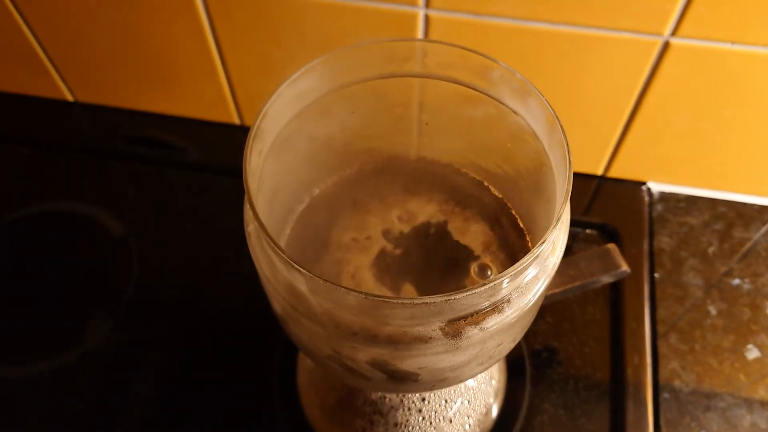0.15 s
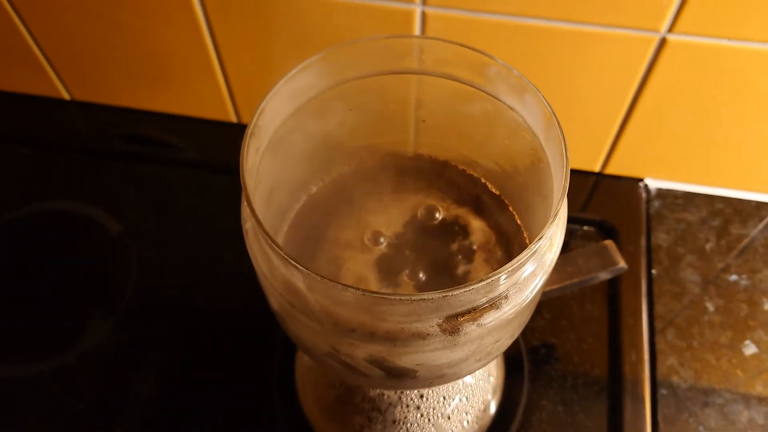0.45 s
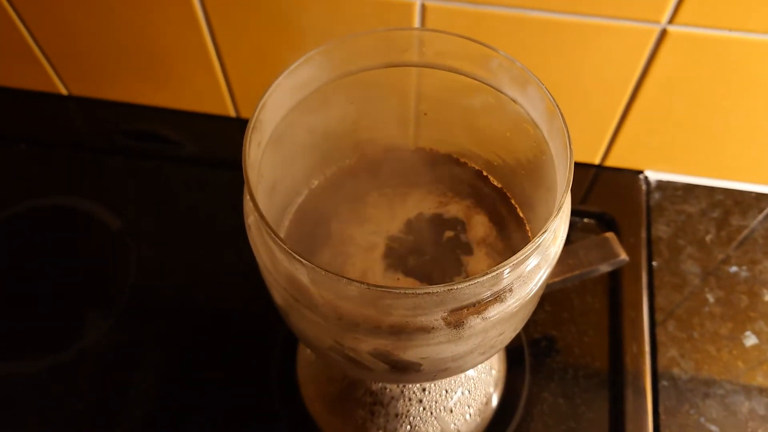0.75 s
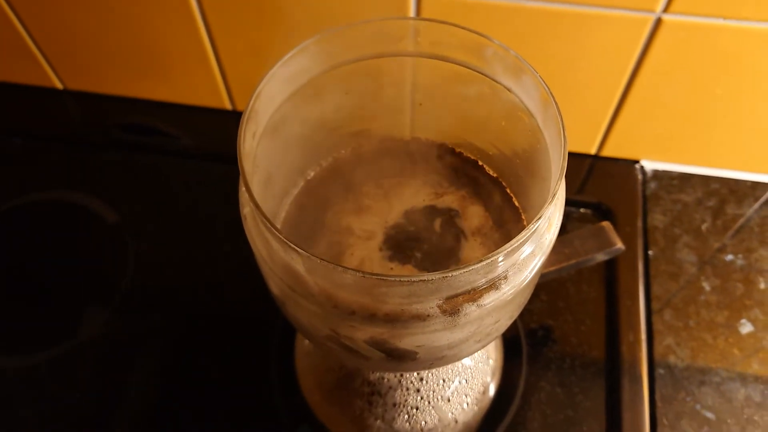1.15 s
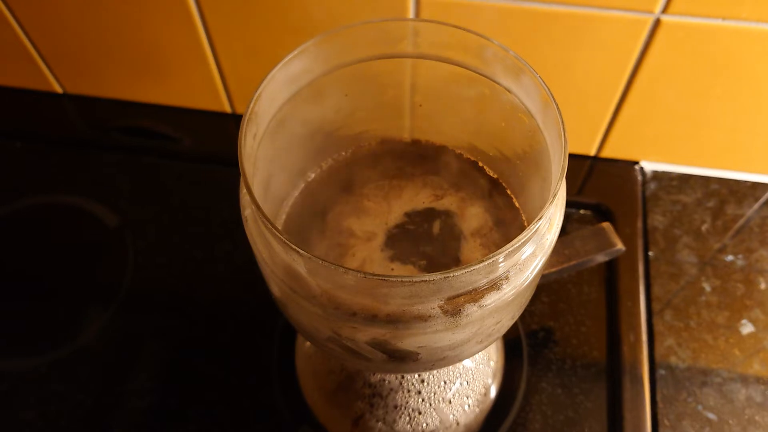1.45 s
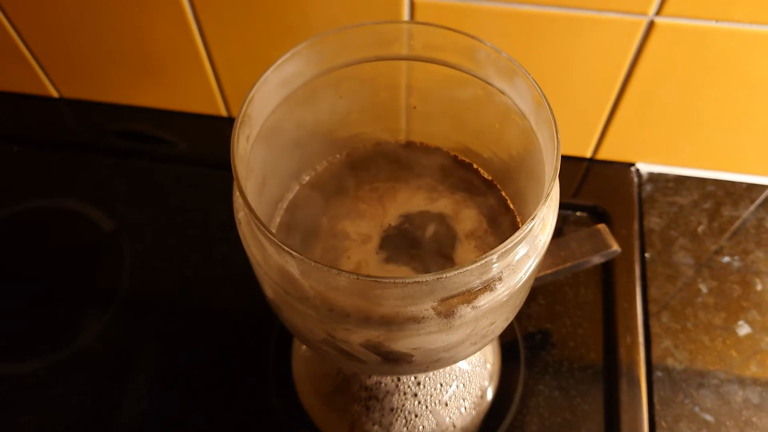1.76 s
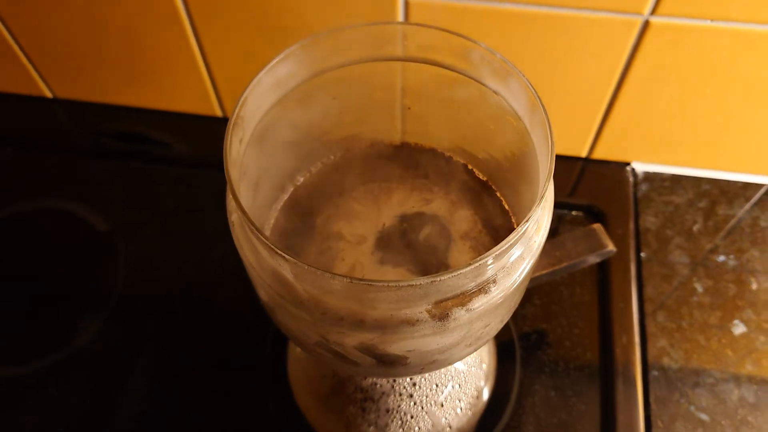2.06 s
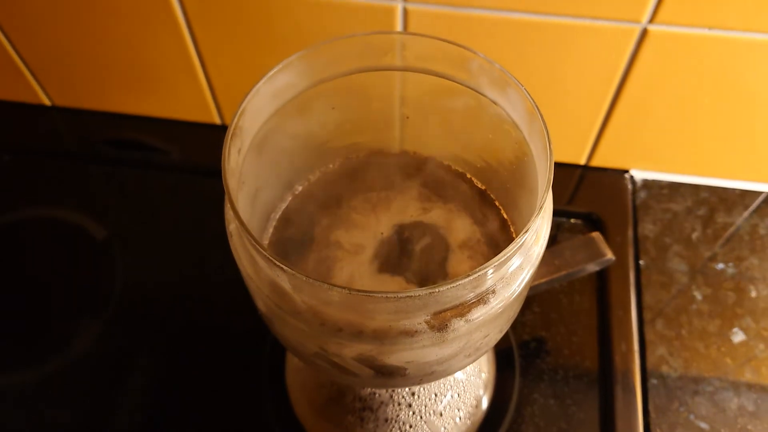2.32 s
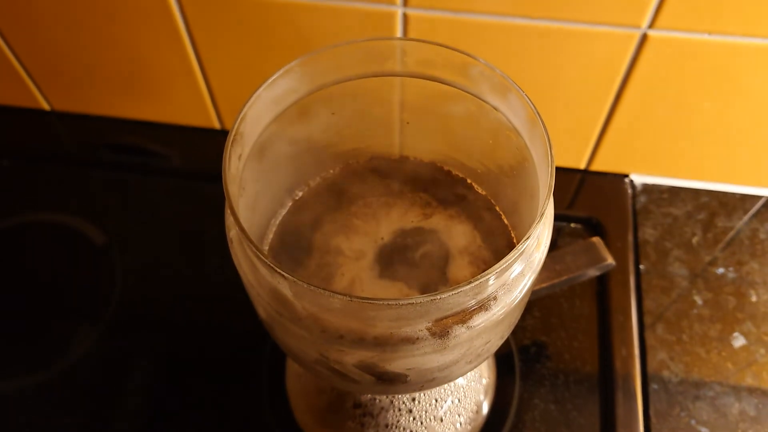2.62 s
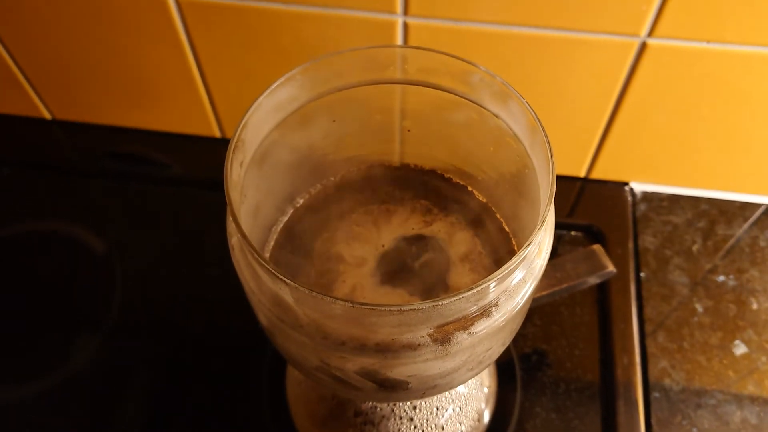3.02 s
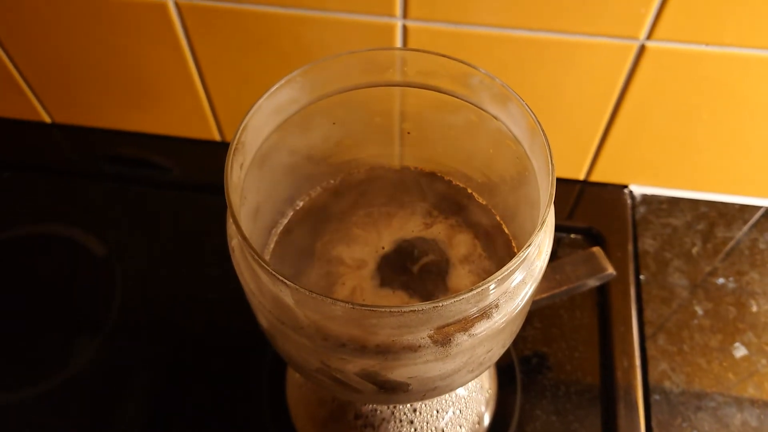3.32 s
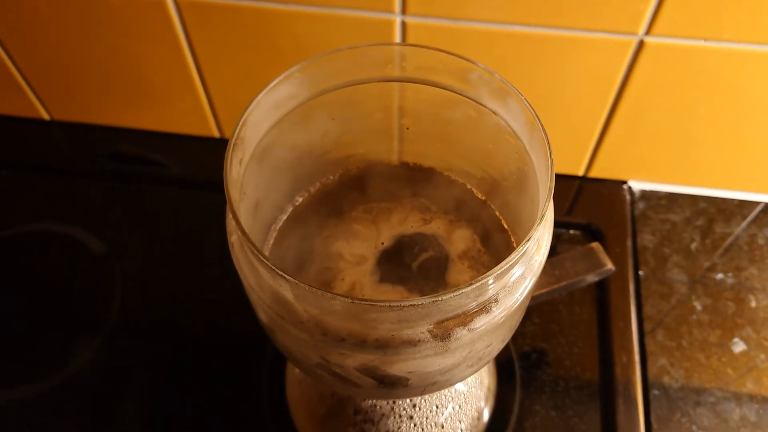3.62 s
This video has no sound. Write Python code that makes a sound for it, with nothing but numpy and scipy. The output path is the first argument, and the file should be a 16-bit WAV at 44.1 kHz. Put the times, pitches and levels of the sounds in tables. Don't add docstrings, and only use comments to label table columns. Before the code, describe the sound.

Coffee maker's last bubbles and sputtering steam die into ticking creaks and a quiet kitchen hum.

```python
import sys
import numpy as np
from scipy import signal
from scipy.io import wavfile
from scipy.ndimage import uniform_filter1d

SR = 44100
rng = np.random.default_rng(int(sys.argv[2]) if len(sys.argv) > 2 else 0)


def decibels_to_gain(level_db):
    exponent = np.asarray(level_db, float) / 20
    return 10 ** exponent


def wrap_up_sound(samples):
    columns = np.atleast_2d(samples).T
    tamed = np.clip(columns, -1, 1)
    steps = np.round(tamed * 32767).astype(np.int16)
    wavfile.write(sys.argv[1], SR, steps)


N = 166698
PORT_LAG_S = 0.00069


def at(table, x, log=False):
    a = np.array(table, float)
    if log:
        return np.interp(np.log(x), np.log(a[:, 0]), a[:, 1])
    return np.interp(x, a[:, 0], a[:, 1])


def band(x, hz, width):
    return signal.lfilter(*signal.iirpeak(min(hz, .45 * SR), hz / width, fs=SR), x)


def noise():
    return rng.standard_normal(N)


def unit(x):
    return x / np.sqrt(np.mean(x ** 2))


def walk(rate):
    k = int(SR / rate)
    steps = np.repeat(rng.standard_normal(N // k + 1), k)
    return unit(uniform_filter1d(uniform_filter1d(steps, k), k)[:N])


def pan(db):
    return decibels_to_gain(np.array([[db / 2], [-db / 2]]))


def spread(mid, side):
    return np.array([mid + side, mid - side])


def late(x, s):
    return np.roll(x, int(s * SR))


def ticks(rows, db):
    x = np.zeros(N)
    np.add.at(x, (np.array(rows)[:, 0] * SR).astype(int), decibels_to_gain(db))
    return x


def push(x, hz, damp):
    turns = np.arange(int(3 * SR / hz)) / SR * hz
    shape = np.sin(2 * np.pi * turns) * np.exp(-turns * damp)
    return signal.fftconvolve(x, shape / shape.max())[:N]


def flick(x, hz):
    u = np.pi * hz * (np.arange(int(2 * SR / hz)) / SR - 1 / hz)
    shape = (1 - 2 * u ** 2) * np.exp(-u ** 2)
    return late(signal.fftconvolve(x, shape)[:N], -1 / hz)


# pitch_hz [Hz], level_db [dB], width_hz [Hz]
APPLIANCE_TONES = [(4537, -88, 15), (14008, -94, 2.3), (4830, -90.5, 14), (417, -82.5, 20), (516, -86, 18)]
# time_s [s], level_db [dB]
RUMBLE = [(0, -66), (1.05, -67), (1.15, -74), (1.7, -68), (2.3, -69), (2.6, -80), (3.78, -82)]
# time_s [s], level_db [dB]
VESSEL_SONG = [
    (3.23, -92),
    (3.27, -60.5),
    (3.5, -60.5),
    (3.68, -52.5),
    (3.78, -68),
]
# middle_s [s], half_width_s [s], left_db [dB], right_db [dB]
TOUCH = (1.803, .016, -5, -18)


def hum(t):
    hum_hz, hum_db, vessel_hz = 49.333, -43, 106.6
    touch_s, length_s, left_db, right_db = TOUCH
    dip = 1 - decibels_to_gain(np.array([[left_db], [right_db]]))
    cover = 1 - dip * np.exp(-((t - touch_s) / length_s) ** 2)
    wander_db = 1 * np.array([walk(19), walk(5.9)]) + 0.55 * walk(18)
    mains = 2 ** .5 * np.sin(2 * np.pi * hum_hz * t + 1.15)
    out = cover * decibels_to_gain(hum_db + wander_db) * mains * pan(-1.8)
    mid, side = (unit(band(band(noise(), vessel_hz, 6.4), vessel_hz, 65)) for _ in range(2))
    out = out + decibels_to_gain(at(RUMBLE, t)) * spread(mid, side)
    song = 2 ** .5 * np.sin(2 * np.pi * vessel_hz * t + 0.19 * walk(7.8))
    out = out + decibels_to_gain(at(VESSEL_SONG, t) + walk(6.3)) * song
    sub_hz, sub_db = 28.3, -79
    out = out + decibels_to_gain(sub_db) * unit(band(band(noise(), sub_hz, 6.4), sub_hz, 12))
    for hz, db, width in APPLIANCE_TONES:
        tone = unit(band(band(noise(), hz, width), hz, 3 * width))
        out = out + decibels_to_gain(db) * tone * pan(13 if hz > 1000 else 0)
    return out


# pitch_hz [Hz], level_db [dB per Hz]
ROOM_LOW = [(60, -11), (80, -20.5), (170, -34.5), (270, -88), (390, -35), (800, -41), (1300, -45.5),
            (2400, -53.5)]
ROOM_HIGH = [(2400, -6.5), (4400, -3.5), (6500, -16), (10500, -16), (13500, -23.5), (16000, -10)]
# time_s [s], simmer_db [dB]
BOIL = [(0, 2.5), (.7, 2.5), (1.7, 2), (2.3, 1), (2.6, 0), (3.78, 0)]
# pitch_hz [Hz], width_hz [Hz], boost_db [dB]
LEFT_RESONANCES = [(1105, 210, 7), (3390, 1500, 2.5), (3900, 41, 8.5), (4600, 300, 11), (5530, 290, -3),
                   (7840, 680, 10.5)]
RIGHT_RESONANCES = [(1195, 230, 9.5), (1960, 460, 11.75), (4966, 57, 12), (5685, 92, 16), (6000, 230, 9.7),
                    (8870, 270, 11.6), (12800, 1800, 8.4)]


def through_port(x, resonances):
    return x + sum((decibels_to_gain(db) - 1) * band(x, hz, width) for hz, width, db in resonances)


def kitchen(t):
    low_db, high_db, split_hz = -62, -78, 2400
    low = high = 0
    for hz in 62 * 2 ** np.arange(0, 8.1, 1 / 3):
        hz = min(hz, 15000)
        mid, side = (band(band(noise(), hz, hz / 3), hz, hz / 3) for _ in range(2))
        x = spread(mid, np.clip(hz / 1000.0, .45, 1) * side)
        db = at(BOIL, t) + 1.1 * walk(9) * (1 if hz < 6000 else .5)
        if hz < split_hz:
            low = low + x * decibels_to_gain(db + at(ROOM_LOW, hz, True))
        else:
            high = high + x * decibels_to_gain(db + at(ROOM_HIGH, hz, True))
    left, right = unit(low) * decibels_to_gain(low_db) + unit(high) * decibels_to_gain(high_db)
    return np.array([through_port(left, LEFT_RESONANCES), through_port(right, RIGHT_RESONANCES)])


# start_s [s], peak_db [dB], pitch_hz [Hz],
# tail_s [s]
TINY_BURSTS = [(0.0484, -56.5, 5600, 0.0022), (0.0706, -48, 11900, 0.0058), (0.105, -57, 5600, .004),
               (0.1296, -57, 10500, .002), (0.1526, -56, 9900, 0.0018), (0.1733, -58, 5540, 0.0026),
               (0.18, -57.5, 10100, 0.0036), (.1795, -55, 14500, 0.0022), (0.1923, -59, 8750, 0.0026),
               (0.531, -59.5, 5600, .002), (0.5388, -50.5, 9700, .001), (0.562, -58, 13800, .003),
               (0.6007, -56, 10900, .003), (0.6285, -60, 10200, .0015), (.63, -62, 14500, .005),
               (0.6485, -60, 14800, .002), (0.648, -61, 4800, .003), (0.6614, -56.5, 6000, .0015),
               (0.6689, -57, 9500, 0.0017), (2.157, -60, 12500, .001), (2.157, -64, 8000, .001)]


def fizz(t):
    hiss_db, wash_db, burst_db = -76.5, -81, -1.5
    early = np.clip((.23 - t) * 12, 0, 1)
    again = np.exp(-((t - .62) / 0.14) ** 2)
    hiss_fade = np.clip((.23 - t) * 6, 0, 1)
    out = decibels_to_gain(hiss_db + 3.7 * walk(35)) * hiss_fade * unit(band(noise(), 9700, 900))
    out += decibels_to_gain(wash_db + 2.6 * walk(60)) * (early + .8 * again) * unit(band(noise(), 13000, 7000))
    length = 1800
    for start, db, hz, tail in TINY_BURSTS:
        i = int(start * SR)
        burst = rng.standard_normal(length) * np.exp(-np.arange(length) / SR / tail)
        drop = band(band(burst, hz, 2000), hz, 3000) + 0.34 * band(burst, 9400, 8300)
        out[i:i + length] += decibels_to_gain(db + burst_db) * drop / np.abs(drop).max()
    return np.array([out, 1.95 * late(out, .0004)])


def residue():
    ticks_per_s, loudest_db = 9, -66
    chance = rng.random((int(ticks_per_s * N / SR), 2))
    x = ticks(chance * (N - 1) / SR, loudest_db - 8 * chance[:, 1])
    grain = noise()[:500] * np.exp(-np.arange(500) / 150)
    x = signal.fftconvolve(x, grain)[:N]
    return np.array([band(x, 8600, 5500), band(x, 8700, 2700) + band(x, 11300, 1500)])


# start_s [s], peak_db [dB], pitch_hz [Hz], t60_s (time to fade by 60 dB) [s],
# glide (share by which the pitch term grows over t60) [ratio]
PLOPS = [(0.0343, -39.5, 178, 0.047, 0.076), (.035, -54.5, 664, 0.088, 0.011),
         (.058, -48, 4500, 0.0091, -0.022), (0.071, -53, 200, 0.16, 0), (.08, -50, 110.3, 0.22, 0.025),
         (.252, -50, 650, .045, .02), (.253, -52, 850, .04, .08), (.264, -58, 1000, .02, .15),
         (.277, -57, 1050, .02, .05), (.2785, -35.5, 659, .075, .005), (.281, -58, 190, .1, 0),
         (.324, -41, 670, .025, 0), (.326, -62, 1850, .03, 0), (.33, -57, 890, .05, 0),
         (.332, -42, 655, .05, .005), (.34, -57, 195, .1, 0), (.344, -43, 670, .07, .005),
         (.37, -68, 655, .6, 0), (.376, -60, 760, .03, 0), (.409, -58, 2930, .018, 0),
         (0.408, -60, 780, 0.031, .1), (.788, -45, 480, 0.0092, -0.096), (.794, -45.5, 410, 0.013, 0.024),
         (0.888, -60, 1350, .015, .1), (.891, -54, 2130, 0.04, -0.095), (.897, -55, 1900, .06, -.1),
         (.934, -55, 580, .05, -.12), (.935, -63, 1900, .09, -.04), (.946, -56, 520, .012, 0),
         (.95, -52, 400, .01, -.05), (1.006, -43.5, 428, 0.012, -0.039), (1.022, -58.5, 510, .03, 0),
         (2.3055, -51.5, 513, 0.0073, 0), (3.24, -65.5, 405, 0.17, -0.038)]


def bubbles():
    rise_turns, lag_s, rough_db = 3.5, .00015, 1.2
    out = np.zeros(N + SR)
    u = np.arange(SR // 2) / SR
    for start, db, hz, t60, glide in PLOPS:
        i = int(start * SR)
        env = (1 - np.exp(-u * hz / rise_turns)) * 1000. ** (-u / t60)
        bend = 1 + glide * np.minimum(u / t60, 1)
        out[i:i + len(u)] += decibels_to_gain(db) * env / env.max() * np.sin(2 * np.pi * hz * u * bend)
    plops = out[:N] * decibels_to_gain(rough_db * walk(180))
    return np.array([plops, late(plops, lag_s)])


# pitch_hz [Hz], width_hz [Hz], level_db [dB]
CAVITY_RINGS = [(5740, 190, 1.5), (7320, 280, -3), (8810, 250, -10.5)]


def cavity(x, widens=0.9):
    return sum(decibels_to_gain(db) * band(x, hz, width * widens) for hz, width, db in CAVITY_RINGS)


# start_s [s], peak_db [dB], ring_db (cavity) [dB], thump_db [dB]
HANDLING_CLICKS = [(0.7827, -39, -28, -7), (0.7884, -32.5, -21, -18), (0.7925, -36, -29, -10),
                   (1.008, -29.5, 11, -6.5), (1.01, -47, -6, -5), (1.466, -38, -11.5, -19),
                   (1.5107, -38, -7, -10), (1.552, -34.5, -14, -5.5), (1.5738, -36.5, -13, -3),
                   (1.606, -38, -11.5, -15), (1.637, -42, -30, -12), (1.7613, -28, -5.5, -9),
                   (1.7734, -36.5, 1.5, 1), (1.7832, -29, -25, -24), (1.7868, -33.5, -3, -3),
                   (1.9143, -49, 8, 5.5)]


def handling_clicks():
    rows = np.array(HANDLING_CLICKS)
    peak_db, ring_db, thump_db = rows[:, 1], rows[:, 2], rows[:, 3]
    pull = -push(ticks(rows, peak_db), 1330, 5.4)
    snap = -push(ticks(rows, peak_db + 0.88 * ring_db), 2760, 5.6)
    click = band(band(pull, 740, 1670), 800, 3700) + decibels_to_gain(-2.5) * band(snap, 2430, 1400)
    ring = 12.3 * cavity(push(ticks(rows, peak_db + ring_db - 6), 6250, 3.6), 1.2)
    ring = ring + push(ticks(rows, peak_db + ring_db - 4), 14300, 3.6)
    thump = push(ticks(rows, peak_db + thump_db - 14), 81, 0.82)
    thump = thump + push(ticks(rows, peak_db + thump_db - 7), 115, 2.7)
    far = decibels_to_gain(-10.5) * band(click, 600, 630) + decibels_to_gain(-13.0) * thump + decibels_to_gain(-46) * ring
    near = click + late(ring, .0004) + late(thump, 0.00015)
    return np.array([late(far, PORT_LAG_S), near])


# start_s [s], end_s [s]
PUFF_SPANS = [
    (.787, .958),
    (1.009, 1.03),
    (1.762, 1.795),
    (1.56, 1.67),
    (2.17, 2.31),
    (1.913, 1.922),
]
# level_db [dB], cavity_db (share) [dB], gurgle_db (share) [dB]
PUFF_LEVELS = [(-52, 1.5, -2), (-47, 0.5, -1.5), (-50.5, -9, -0.5), (-60, -26, -5.5), (-72, -12, -12),
               (-49.5, -24, -17)]


def gurgling():
    wet = decibels_to_gain(-6.5 + 2.2 * walk(150)) * unit(band(band(noise(), 550, 700), 750, 1700))
    return wet + decibels_to_gain(-12.0) * unit(band(noise(), 2900, 1300))


def steam(t):
    rise_s, fall_s = .09, .04
    env = rung = wet = 0
    for (start, end), (db, ring_db, wet_db) in zip(PUFF_SPANS, PUFF_LEVELS):
        rise, fall = (min(s, (end - start) / 1.48) for s in (rise_s, fall_s))
        swell = (t > start) * np.clip(0.26 + 0.88 * (t - start) / rise, 0, 1)
        puff = decibels_to_gain(db) * swell * np.clip((end - t) / fall, 0, 1) ** 0.74
        env = env + puff
        rung = rung + puff * decibels_to_gain(ring_db)
        wet = wet + puff * decibels_to_gain(wet_db)
    right = decibels_to_gain(-11) * unit(band(noise(), 14000, 6400))
    left = decibels_to_gain(-15.5) * unit(band(noise(), 14500, 6000))
    gurgle = np.array([gurgling(), gurgling()])
    ring = decibels_to_gain(walk(200)) * unit(cavity(noise())) * decibels_to_gain(np.array([[-25], [0]]))
    return env * np.array([left, right]) + wet * gurgle + rung * ring


# time_s [s], level_db [dB]
SEEP_LEVEL = [
    (2, -110),
    (2.12, -80),
    (2.26, -76),
    (2.42, -79),
    (2.7, -110),
]


def seeping_hiss():
    hiss = unit(band(band(noise(), 2500, 2300), 2700, 3700))
    hiss = hiss + decibels_to_gain(-9) * unit(band(noise(), 9750, 500))
    return hiss + decibels_to_gain(-3) * unit(band(noise(), 13000, 5000))


def seep(t):
    return decibels_to_gain(at(SEEP_LEVEL, t) + 2.2 * walk(29.96)) * np.array([seeping_hiss(), seeping_hiss()])


# start_s [s], peak_db [dB], edge_db [dB], thump_db [dB]
CREAK_TICKS = [(2.1582, -51, 0, 10), (2.1687, -45, -22, 2), (2.1803, -39, -6, -2), (2.1875, -39.5, -12, -5),
               (2.1967, -44, 1, 6.5), (2.2035, -41, -3, -22), (2.2101, -38, -1.5, -3),
               (2.2222, -42.5, -3, 0), (2.2254, -48, -16, -10), (2.2369, -41.5, -8, -6),
               (2.2429, -41.5, -7, -6), (2.2485, -41.5, -4, -6), (2.2572, -40.5, -18, -13),
               (2.2653, -44, -10, -8), (2.2721, -42, -12, -8), (2.281, -42.5, -8, -12),
               (2.2907, -39.5, -13, -4), (2.3069, -49.5, -7, -3), (2.3185, -52, -22, -5),
               (2.4715, -40.5, -10.5, 1)]
# pitch_hz [Hz], width_hz [Hz], level_db [dB]
EDGE_RINGS = [(3130, 1700, 1.5), (4500, 820, -1.5), (9200, 5900, -6)]


def creaks():
    rows = np.array(CREAK_TICKS)
    peak_db, edge_db, thump_db = rows[:, 1], rows[:, 2], rows[:, 3]
    body = flick(ticks(rows, peak_db - 2), 783)
    body = body + decibels_to_gain(-15) * band(body, 1130, 820)
    sharp = push(ticks(rows, peak_db + edge_db + 8.5), 4800, 4.2)
    edge = sum(decibels_to_gain(db) * band(band(sharp, hz, width), hz, 2 * width) for hz, width, db in EDGE_RINGS)
    thump = -push(ticks(rows, peak_db + thump_db - 4), 113, 1.6)
    far = decibels_to_gain(-8.5) * late(body + edge + 0.48 * thump, PORT_LAG_S)
    return np.array([body + edge + thump, far])


def scene():
    t = np.arange(N) / SR
    start = hum(t) + kitchen(t) + fizz(t) + residue() + bubbles()
    return start + handling_clicks() + steam(t) + seep(t) + creaks()


def band_limit(x):
    return signal.sosfilt(signal.butter(12, 16320, fs=SR, output="sos"), x)


def record(dry):
    top_cut = signal.ellip(8, .2, 70, 16000, fs=SR, output="sos")
    return band_limit(signal.sosfilt(top_cut, dry))


dry = scene()
out = record(dry)
wrap_up_sound(out)
```